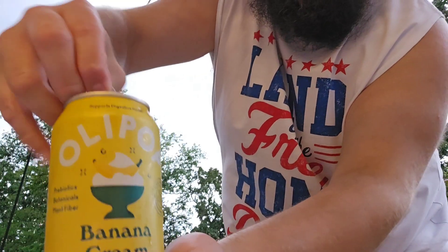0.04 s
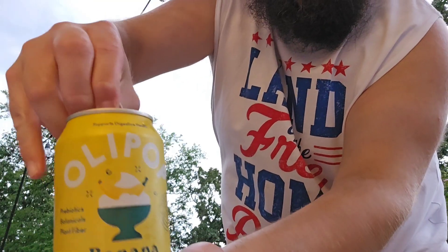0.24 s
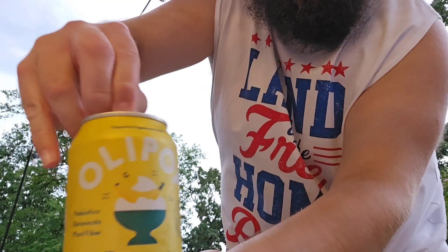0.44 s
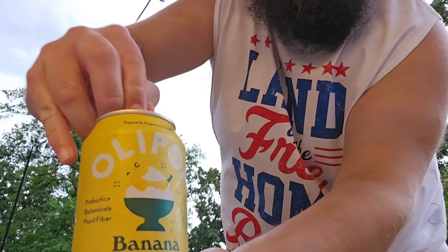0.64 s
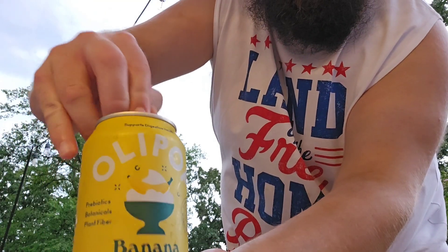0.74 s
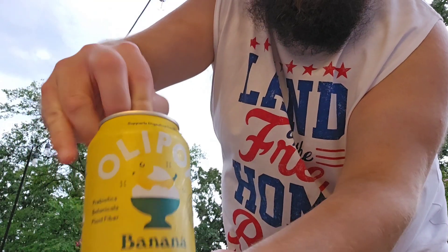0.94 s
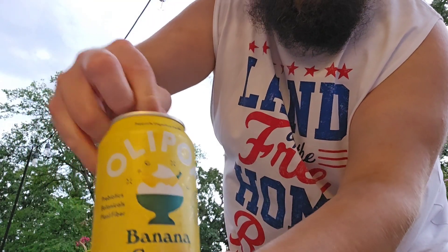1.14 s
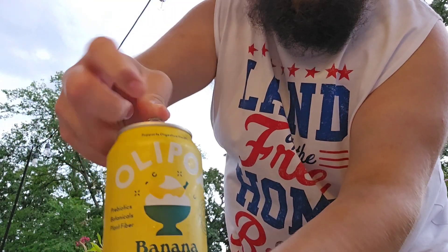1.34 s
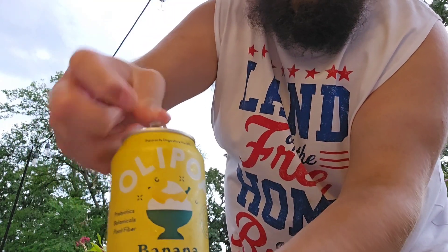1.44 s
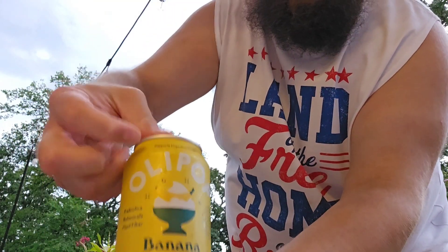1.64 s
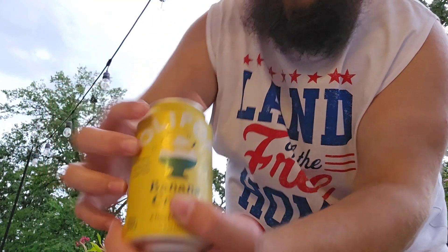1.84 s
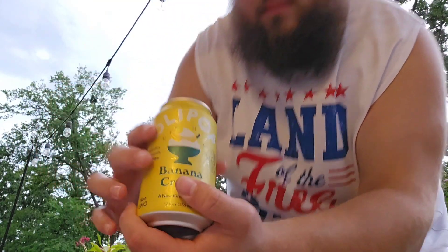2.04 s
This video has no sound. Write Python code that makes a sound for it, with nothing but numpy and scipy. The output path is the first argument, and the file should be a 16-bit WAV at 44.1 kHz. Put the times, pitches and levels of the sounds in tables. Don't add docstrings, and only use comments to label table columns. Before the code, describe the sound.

A drink can cracks open with one sharp metallic snap outdoors, followed by faint ticks and rubbing

```python
import sys
import numpy as np
from scipy import signal
from scipy.fft import rfft, irfft
from scipy.io import wavfile
from scipy.ndimage import uniform_filter1d

SR = 44100
rng = np.random.default_rng(int(sys.argv[2]) if len(sys.argv) > 2 else 0)


def to_wav(sig):
    pcm = np.clip(np.atleast_2d(sig), -1, 1) * 32767
    pcm = np.round(pcm).astype(np.int16)
    wavfile.write(sys.argv[1], SR, pcm.T)


def natural_amplitude(level_db):
    exponent = np.asarray(level_db, float) / 20
    return 10 ** exponent


N = 92610
EDGE_HZ = 15850
CRACK_S, LEAD_S = .2269, .02
SHARED_BELOW_HZ = 2000


def evened(x):
    return x / np.sqrt(np.mean(x ** 2) + 1e-20)


def read(points, hz):
    f, value = np.transpose(points)
    return np.interp(np.log(hz + 1), np.log(f + 1), value)


def coloured(x, points):
    hz = np.fft.rfftfreq(x.shape[-1], 1 / SR)
    low = np.minimum(hz / points[0][0], 1) ** 2
    return irfft(rfft(x) * natural_amplitude(read(points, hz)) * low, x.shape[-1])


def filtered(x, order, hz, kind):
    return signal.sosfiltfilt(signal.butter(order, hz, kind, fs=SR, output="sos"), x)


def ring(x, hz, width_hz):
    r = np.exp(-np.pi * width_hz / SR)
    return signal.lfilter([1 - r, 0, r - 1], [1, -2 * r * np.cos(2 * np.pi * hz / SR), r * r], x)


def add(mix, s, sound):
    part = mix[:, round(s * SR):][:, :sound.shape[1]]
    part += sound[:, :part.shape[1]]


# delay_s, level_db
SNAPS = [
    (-.0061, -27),
    (-.0022, -21),
    (0, 0),
    (.0012, -2),
    (.0031, -2.5),
    (.0051, -7),
    (.0085, -13),
    (.0108, -16),
]


def tear():
    t = np.arange(SR // 2) / SR - LEAD_S
    before = np.exp(np.minimum(t, 0) / .0026)
    after = 2 * natural_amplitude(-60 * np.maximum(t, 0) / .032)
    shape = natural_amplitude(-17) * np.where(t < 0, before, after)
    blows = np.zeros(len(t))
    for delay, db in SNAPS:
        shape = shape + natural_amplitude(db) * (t >= delay) * np.exp(-np.maximum(t - delay, 0) / .0011)
        blows[np.searchsorted(t, delay)] = natural_amplitude(4 * db)
    return t, shape, blows


# pitch_hz, level_db
SNAP_COLOUR = [(700, -15.5), (3300, -8), (4200, -19), (5800, -14), (8000, -4.5), (11500, 1.5),
               (14000, -0.5), (16300, -9)]


def snap_noise(t, shape):
    snaps = natural_amplitude(-6) * shape * evened(coloured(rng.standard_normal((2, len(t))), SNAP_COLOUR))
    low = filtered(snaps, 2, SHARED_BELOW_HZ, "low")
    top = filtered(snaps, 2, 10000, "high")
    shared_low = low[0] * natural_amplitude(-60 * np.maximum(t, 0) / .03)
    top_gain = natural_amplitude(np.array([[-3.5], [1.5]]))
    return snaps - low + shared_low + (top_gain - 1) * top


# pitch_hz, left_db, right_db, fade_s (time to fall 60 dB)
LID = [(617, -11, -11, 0.022), (822, -9, -9, 0.046), (855, -25, -26, 0.19), (1410, -19, -20, 0.041),
       (1791, -11, -12, .025), (2378, -8, -3, 0.035), (2950, -14, -11, 0.03), (3364, -17, -12, 0.056),
       (3406, -17, -16, 0.14), (3870, -17, -19, 0.03), (4994, -14.5, 0, .02), (7800, -0.5, -9, .022),
       (10724, -5.5, -3.5, 0.022), (13440, -18.5, -12, .025)]


def lid_rings(shape, blows):
    since = np.arange(SR // 3) / SR
    grit = rng.standard_normal(len(shape))
    rings = np.zeros((2, len(shape)))
    for hz, left_db, right_db, t60 in LID:
        lag = (hz / 2000) ** 2 / 2 * np.array([[0], [1]])
        fade = natural_amplitude(np.array([[left_db], [right_db]]) - 60 * since / t60)
        mode = fade * np.sin(2 * np.pi * hz * since + lag)
        scrape = .015 * min(hz / SHARED_BELOW_HZ, 1) ** 2 * shape * grit
        rings += signal.fftconvolve((blows + scrape)[None], mode, axes=1)[:, :len(shape)]
    return natural_amplitude(-15) * rings


# pitch_hz, level_db
PUFF = [(600, -16.5), (860, -10.5), (1100, -18.5), (2800, -8.5), (3430, -5), (5500, -16), (12500, -4),
        (16000, -10)]


def gas_puff(t):
    after = np.maximum(t, 0)
    burst = natural_amplitude(-30.5 - 60 * after / .13)
    linger = natural_amplitude(-43 - 60 * after / .4)
    fade = np.clip(t / .016, 0, 1) ** 2 * (burst + linger)
    puff = fade * evened(coloured(rng.standard_normal((2, len(t))), PUFF))
    fizz = evened(uniform_filter1d(rng.standard_normal(len(t)), size=120))
    return puff * natural_amplitude(2.5 * fizz + np.array([[-1.2], [1.2]]))


def crack():
    t, shape, blows = tear()
    snaps = snap_noise(t, shape) + lid_rings(shape, blows)
    no_deep = signal.butter(4, 430, "high", fs=SR, output="sos")
    return signal.sosfilt(no_deep, snaps), gas_puff(t)


# pitch_hz, level_db
TICK_COLOUR = [(1000, -29), (1500, -10), (2700, -5.5), (3600, 3), (4400, -3), (6500, 1.5), (8700, 1.5),
               (12000, -12.5)]


def tick(crackle_db, hz, ring_db, t60):
    t = np.arange(4096) / SR
    grit = rng.standard_normal((3, 4096))
    fade = np.minimum(t / 0.00029, 1) * (natural_amplitude(-60 * t / t60) + 0.093 * natural_amplitude(-20 * t / t60))
    width_hz = 0.34 * hz
    body = evened(ring(ring(grit[2], hz, width_hz), hz, width_hz))
    crackle = evened(coloured(grit[:2], TICK_COLOUR))
    return fade * (natural_amplitude(ring_db) * body + natural_amplitude(crackle_db) * crackle)


# start_s, crackle_db, pitch_hz, ring_db, fade_s
TICKS = [(.4865, -63, 4000, -64, 0.02), (.4936, -45, 1480, -55, 0.032), (.4937, -70, 13900, -52, 0.032),
         (0.5131, -53.5, 13480, -55, 0.031), (0.8436, -46.5, 1380, -53, .02),
         (0.8444, -62, 3700, -62, 0.034), (0.8524, -60, 13180, -64, 0.045), (.976, -66, 4270, -66.5, .03),
         (.998, -63.5, 1656, -63.5, 0.053), (1.3322, -61, 1710, -67, 0.03),
         (1.409, -63.5, 1720, -63, 0.041), (1.5858, -51.5, 2000, -60, .03), (1.586, -66, 13600, -55, 0.042),
         (1.5925, -63, 1900, -62, 0.02), (1.866, -60, 3590, -62, 0.031), (1.896, -55, 13500, -65, .03),
         (0.086, -72, 12510, -64, 0.016), (.715, -65, 13030, -70, .03), (2.096, -55, 1405, -54, .03)]


def ticks():
    out = np.zeros((2, N))
    for s, *row in TICKS:
        add(out, s, tick(*row))
    return out


def dent(level_db, hz, t60, pan_db):
    t = np.arange(8192) / SR
    sides = natural_amplitude(pan_db * np.array([[.5], [-.5]]))
    tone = np.sin(2 * np.pi * hz * t + np.array([[0], [.5]])) * sides
    return natural_amplitude(level_db - 60 * t / t60) * np.minimum(t / .0008, 1) * tone


# start_s, level_db, pitch_hz, fade_s, left_minus_right_db
DENTS = [(.2165, -44, 5000, .06, -16), (.2198, -31, 5020, .03, -16), (.2247, -27, 5100, .02, -8),
         (.2258, -20, 4980, .016, -14), (.2175, -42, 3350, .05, -3), (.22, -31, 3300, .03, -4),
         (.2271, -17, 3440, .045, -4), (.2262, -14, 3340, .05, -5), (.2265, -25, 3738, .03, 0),
         (.2298, -16, 3096, .05, -4), (.2405, -33, 3400, .1, 0), (.2212, -43, 1700, .03, 0),
         (.2262, -22, 1190, .014, 0), (.2263, -23, 2050, .012, -1), (.2265, -32, 570, .025, 0),
         (.2268, -29, 690, .025, 0), (.4938, -47, 7900, .015, 0), (.4936, -50, 5100, .012, -4),
         (.4955, -55, 3600, .03, -4), (.495, -54, 1550, .03, 0), (.514, -57, 13300, .012, 0),
         (.8437, -54, 1380, .03, 0), (.8437, -44, 6400, .014, -3), (.845, -49, 3750, .016, 0),
         (.844, -51, 7400, .014, -3), (.8487, -59, 6300, .012, 0), (.8525, -59, 8600, .02, -2),
         (1.5812, -58, 2100, .012, 0), (1.5858, -47, 1650, .014, 0), (1.586, -43, 2350, .012, 0),
         (1.5905, -55, 6400, .016, 0), (1.332, -59, 3800, .015, 0), (1.41, -64, 3500, .03, 0),
         (.897, -50.5, 1070, 0.012, 0), (1.167, -56, 1230, 0.048, 0), (1.173, -54.5, 1457, 0.061, 0),
         (1.169, -59, 2360, 0.021, 0), (1.612, -52.5, 1490, 0.036, 0), (1.709, -61, 1444, 0.074, 0),
         (2.05, -57, 866.6, 0.24, 0)]


def dents():
    out = np.zeros((2, N))
    for s, *row in DENTS:
        add(out, s, dent(*row))
    return out


# start_s, level_db
RUB = [
    (0, -100),
    (.1, -87),
    (0.202, -59.5),
    (.4, -87.5),
    (1.66, -82),
    (1.76, -69),
    (1.86, -64),
    (1.96, -65),
    (2.04, -60),
    (2.1, -63),
]
# pitch_hz, level_db
RUB_COLOUR = [(1000, -13.5), (2300, -2.5), (2950, -22), (3500, -5), (4800, -16), (5800, -4), (9500, -10),
              (13000, -5)]


def rub():
    t, db = np.transpose(RUB)
    strength = natural_amplitude(np.interp(np.arange(N) / SR, t, db))
    return strength * wash(RUB_COLOUR, patchy_db=2, flicker_db=1.5)


# pitch_hz, width_hz, level_db
INSECTS = [(5350, 300, -82), (3440, 100, -73), (4030, 53, -76.5), (3530, 120, -76), (5900, 80, -69.5),
           (4440, 72, -71), (3480, 110, -79), (5380, 200, -81), (5200, 900, -72.5)]
# start_s, end_s
SINGS = [(0, 2.1), (0, .22), (.01, .12), (1.8, 1.92), (.026, .036), (2.08, 2.1), (1.685, 1.7), (1.17, 1.62),
         (.14, .22)]


def insects():
    t, out = np.arange(N) / SR, np.zeros((2, N))
    for (hz, width_hz, db), (start, end) in zip(INSECTS, SINGS):
        buzz = evened(ring(ring(rng.standard_normal((2, N)), hz, width_hz), hz, width_hz))
        singing = np.clip(np.minimum(t - start, end - t) * 100 + 1, 0, 1)
        out += natural_amplitude(db) * singing * buzz
    return out


# pitch_hz, level_db
HISS = [(1000, -2), (1700, 1), (3000, -17.5), (3700, -7), (4700, -16), (8500, -11), (10800, -18),
        (13500, -10.5)]


def leaves():
    return natural_amplitude(-70) * wash(HISS, patchy_db=3, flicker_db=2)


# pitch_hz, level_db
RUMBLE = [(28, -24), (33, -5), (68, 2), (155, -4.5), (250, -19), (480, -27.5), (850, -32), (1050, -48.5)]


def traffic():
    return natural_amplitude(-40.5) * wash(RUMBLE, patchy_db=-0.77, flicker_db=0.0, top_db=-9.5)


# pitch_hz, share (1 = same, below 0 = opposed)
SAME = [(130, 0.965), (290, 0.85), (640, 0.3), (1400, -0.42), (3000, .15), (7000, -.05), (15000, .08)]


def wash(points, patchy_db, flicker_db, top_db=0):
    frames, hz = N // 256 + 5, np.fft.rfftfreq(1024, 1 / SR)
    a, b, c, d, patches = rng.standard_normal((frames, 513, 5)).T
    patches = uniform_filter1d(patches, size=14, axis=0)
    patches = evened(uniform_filter1d(patches, size=10, axis=1))
    flicker = evened(uniform_filter1d(rng.standard_normal(frames), size=2))
    same = np.clip(read(SAME, hz), -1, 1)[:, None]
    left = a + 1j * b
    right = same * left + np.sqrt(1 - same ** 2) * (c + 1j * d)
    octaves_above = np.log2(np.maximum(hz / points[-1][0], 1))
    shape = natural_amplitude(read(points, hz) + top_db * octaves_above)
    shape *= np.minimum(hz / points[0][0], 1) ** 2 * (hz < EDGE_HZ)
    z = np.array([left, right]) * shape[:, None] * natural_amplitude(patchy_db * patches + flicker_db * flicker)
    return evened(signal.istft(z, nperseg=1024, noverlap=768)[1][:, :N])


def scene():
    mix = traffic() + leaves() + rub() + insects() + ticks() + dents()
    snap, gas = crack()
    add(mix, CRACK_S - LEAD_S, gas)
    mix = irfft(rfft(mix) * (np.fft.rfftfreq(N, 1 / SR) < EDGE_HZ), N)
    add(mix, CRACK_S - LEAD_S, snap)
    return mix * natural_amplitude(np.array([[.1], [-.1]]))


def roll_off(x):
    return signal.sosfilt(signal.butter(12, 16470, fs=SR, output="sos"), x)


def record(dry):
    hz = np.fft.rfftfreq(N, 1 / SR)
    notch_db = -16 / (1 + ((hz - 9800) / 560) ** 4)
    heard = irfft(rfft(dry) * natural_amplitude(notch_db), N)
    ceiling = .95
    soft = ceiling * np.tanh(heard / ceiling)
    finished = irfft(rfft(soft) * np.clip((16550 - hz) / 400, 0, 1) ** 2, N)
    return roll_off(finished)


dry = scene()
out = record(dry)
to_wav(out)
```